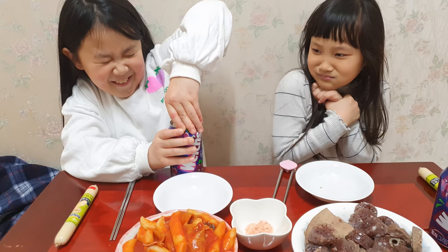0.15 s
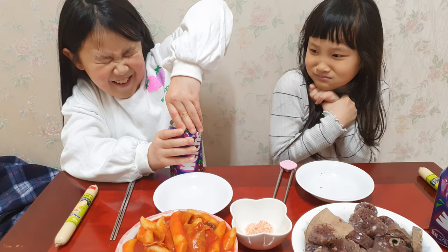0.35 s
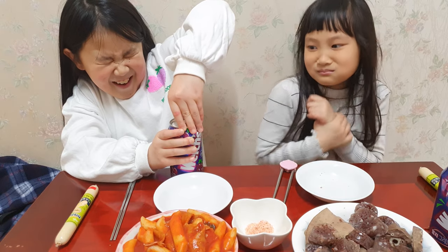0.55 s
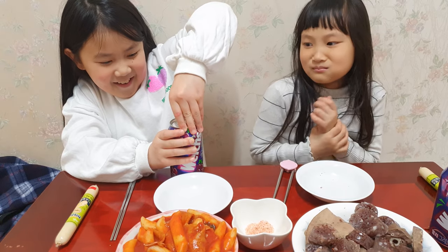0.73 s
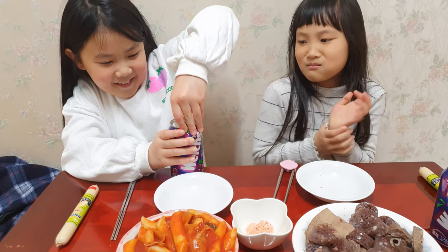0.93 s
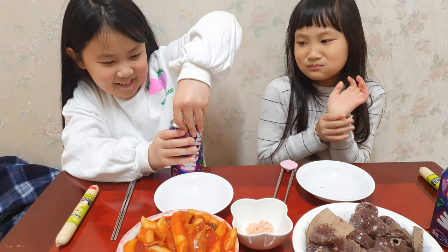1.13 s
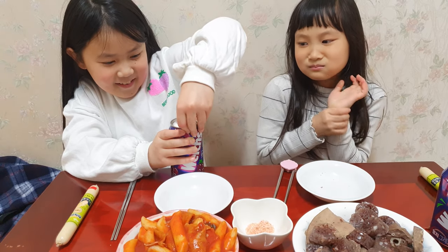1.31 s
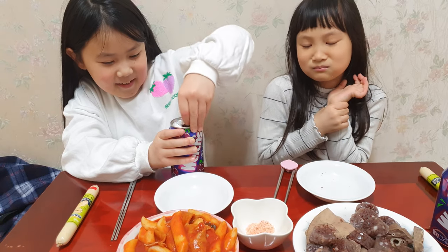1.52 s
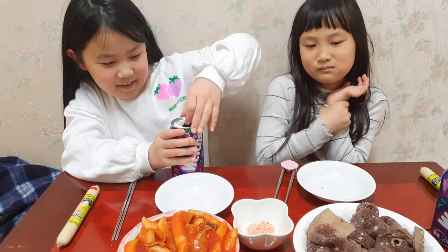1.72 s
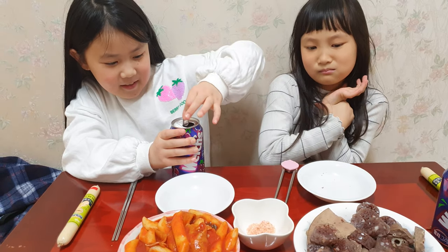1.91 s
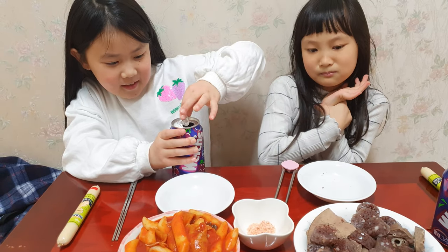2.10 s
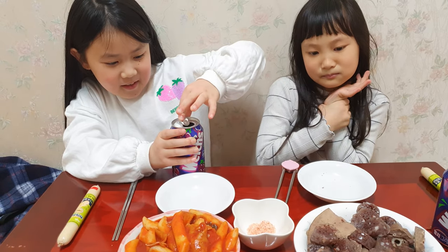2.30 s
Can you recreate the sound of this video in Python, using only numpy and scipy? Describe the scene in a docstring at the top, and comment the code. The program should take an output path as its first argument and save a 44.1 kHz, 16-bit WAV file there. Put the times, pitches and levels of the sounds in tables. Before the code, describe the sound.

A drink can cracks open with two sharp bursts, then light clicks and faint fizzing.

```python
"""A small room, a phone microphone close to a drink can on a low table. The ring-pull is forced open:
gas bursts twice through the tearing seal, shaking can and table and overloading the input, and the tab
snaps against the lid. Nails tick on the tab, fingers slide on the wall and rub the rim, and the can
knocks on the table. The drink fizzes faintly over a wavering low hum."""
import sys
import numpy as np
from scipy import signal
from scipy.io import wavfile
from scipy.ndimage import uniform_filter1d

SR = 44100
rng = np.random.default_rng(int(sys.argv[2]) if len(sys.argv) > 2 else 0)


def log_audio(samples):
    """Write samples as a 16-bit WAV file to the path given in sys.argv[1]."""
    # one column per channel
    frames = np.atleast_2d(samples).T
    # limit to full scale, then quantise
    limited = np.clip(frames, -1, 1)
    pcm = np.round(limited * 32767).astype(np.int16)
    wavfile.write(sys.argv[1], SR, pcm)


N = 103635


def amp(db):
    return 10 ** (np.asarray(db) / 20)


def unit_rms(x):
    return x / np.sqrt(np.mean(x ** 2) + 1e-20)


def at_hz(points, hz):
    f, values = np.transpose(points)
    return np.interp(np.log(hz + 1), np.log(f + 1), values)


def fader(rows, col=1):
    rows = np.array(rows)
    return amp(np.interp(np.arange(N) / SR, rows[:, 0], rows[:, col]))


def add(mix, start, sound):
    part = mix[round(start * SR):][:len(sound)]
    part += sound[:len(part)]


def slow_noise(span, size=N):
    return unit_rms(uniform_filter1d(rng.standard_normal(size), span))


def resonate(x, hz, width):
    """A two-pole resonance of gain 1."""
    return signal.lfilter(*signal.iirpeak(hz, hz / width, SR), x)


def hiss(colour, patchy_db, size=N):
    """Noise of a given colour with drifting patches."""
    hz = np.fft.rfftfreq(1024, 1 / SR)
    real, imag, patches = rng.standard_normal((size // 256 + 5, 513, 3)).T
    patches = unit_rms(uniform_filter1d(uniform_filter1d(patches, 16, 0), 12, 1))
    spectrum = (real + 1j * imag) * amp(at_hz(colour, hz)[:, None] + patchy_db * patches)
    return unit_rms(signal.istft(spectrum, nperseg=1024, noverlap=768)[1][:size])


def ring(modes, wobble=0.92):
    """The dying tones of a struck object, each wavering on its own."""
    t = np.arange(SR // 2) / SR
    wavers = [1 + wobble * slow_noise(500, len(t)) * np.minimum(t / 0.0043, 1) for _ in modes]
    tones = sum(waver * amp(db - 60 * t / t60) * np.sin(2 * np.pi * (hz * t + rng.random() / 4))
                for waver, (hz, db, t60) in zip(wavers, modes))
    return tones * np.minimum(t / 0.0012, 1)


# Hum in the room: t/s, then level/dB of each of the three tones
HUM_LEVELS = [(0.0, -31, -27, -63), (0.04, -29.5, -37.5, -32.5), (0.52, -33, -34, -35.5),
              (0.69, -37, -48, -65), (0.78, -35, -40, -46), (1.18, -45, -48.5, -43),
              (1.85, -30.5, -46.5, -46), (1.93, -28, -35.5, -37), (2.05, -39, -37.5, -37),
              (2.35, -28, -41, -30)]
def hum(tones_hz=(87.6, 120.5, 61.1), wanders=(.03, .02, .12), flutter_db=1.6):
    """Three low tones that waver in pitch and level."""
    out = np.zeros(N)
    for col, (hz, wander) in enumerate(zip(tones_hz, wanders), 1):
        drift, flutter = (unit_rms(uniform_filter1d(slow_noise(2000), 2000)) for _ in range(2))
        phase = 2 * np.pi * np.cumsum(hz * (1 + wander * drift)) / SR
        out += fader(HUM_LEVELS, col) * amp(flutter_db * flutter) * np.sqrt(2) * np.sin(phase)
    return out


# Background spectrum at the microphone: f/Hz, level/dB
ROOM_TONE = [(20, -19.5), (59, -7.5), (101, -2.5), (141, -5), (208, -19.5), (291, -21), (419, -38.5),
             (2230, -44), (9010, -44.5), (15700, -61)]
def room_tone(patchy_db):
    """A soft rumble with a trace of hiss."""
    return hiss(ROOM_TONE, patchy_db)


# The drink, close up: t/s, lower band level/dB, upper band level/dB
FIZZ_LEVELS = [(0.0, -58.5, -54), (0.3, -56, -78), (0.42, -60.5, -62), (0.58, -51, -48),
               (0.83, -62.5, -56.5), (0.87, -64, -53.5), (1.0, -61, -49.5), (1.06, -68, -63.5),
               (1.41, -67, -64), (1.61, -65, -77), (1.79, -57, -58.5), (2.07, -59, -70.5),
               (2.35, -57.5, -67)]
# Bubble spectrum: f/Hz, level/dB
FIZZ_SPECTRUM = [(1100, -49), (2000, -20), (3420, 2.5), (4270, -5.5), (5080, -1.5), (5680, -1.5), (8830, 2),
                 (11300, -9.5), (15700, -20)]
def fizz(split_hz=6540, pops_per_s=60):
    """Fine hiss of bubbles with sparse louder pops; its upper band swells on its own."""
    pops = rng.exponential(1, N) * (rng.random(N) < pops_per_s / SR)
    bubbles = hiss(FIZZ_SPECTRUM, 0.69) * (1 + 30 * uniform_filter1d(pops, 60))
    low, high = (signal.sosfiltfilt(signal.butter(4, split_hz, kind, fs=SR, output="sos"), bubbles)
                 for kind in ("low", "high"))
    return fader(FIZZ_LEVELS) * unit_rms(low) + fader(FIZZ_LEVELS, col=2) * unit_rms(high)


# Fingers on the can wall: t/s, length/s, level/dB
FINGER_SLIDES = [(0.039, 0.38, -58), (1.575, 0.18, -53.5), (1.853, 0.14, -45.5)]
# Spectrum of the rubbed wall: f/Hz, level/dB
WALL_SPECTRUM = [(350, -47), (600, -17), (976, 0.5), (1600, -17), (3420, -7.5), (9160, -9.5),
                 (11000, -20.5), (14300, -51.5)]
def finger_slides():
    """Skin brushes the can wall in short swishes."""
    out = np.zeros(N)
    for start, length, db in FINGER_SLIDES:
        t = np.arange(round(length * SR)) / SR
        fade = np.clip(np.minimum(t / 0.0079, (length - t) / 0.055), 0, 1)
        add(out, start, amp(db) * hiss(WALL_SPECTRUM, 1.5, len(t)) * fade)
    return out


def contact_noise(decay_s=0.0013, size=600):
    return rng.standard_normal(size) * np.exp(-np.arange(size) / SR / decay_s)


# Nails, close to the microphone: t/s, peak level/dB, bright spot f/Hz, relative tab ring level/dB
NAIL_TICKS = [(0.054, -33.5, 2900, -11.5), (0.187, -33.5, 5400, -18), (0.846, -25.5, 8600, -10),
              (1.2909, -29.5, 8330, -22), (1.581, -34.5, 2800, -4.5), (1.594, -40.5, 3960, -7),
              (1.8598, -17, 7200, -33), (1.8639, -17.5, 6090, -47), (1.873, -20.5, 5170, -54),
              (1.8774, -22, 3730, -33), (1.927, -29.5, 3570, -25), (1.939, -42, 3260, -8)]
# Modes of the tab: f/Hz, level/dB, t60/s
TAB_MODES = [(680, -8.5, 0.031), (950, -7, 0.33), (1153, -4, 0.19), (1223, -4, 0.2)]
def nail_ticks(low_hz=2170, top_hz=10200):
    """Short scratchy clicks, each with its own bright spot, set the tab ringing."""
    out = np.zeros(N)
    for start, db, hz, tab_db in NAIL_TICKS:
        band = signal.butter(4, [low_hz, min(top_hz, 2 * hz)], "band", fs=SR, output="sos")
        scratch = signal.sosfilt(band, contact_noise())
        click = 0.21 * scratch + resonate(resonate(scratch, hz, 0.6 * hz), hz, 1.2 * hz)
        add(out, start, amp(db) * click / abs(click).max())
        add(out, start, amp(db + tab_db) * ring(TAB_MODES) / 2)
    return out


# The seal, close up: t/s, gas level/dB, gas decay/s, can level/dB, thud level/dB, gas bass gain/dB
SEAL_CRACKS = [(0.2325, 8, 0.0066, -33.5, -12, -4.5), (.468, 8, 0.023, -9, -8, 6)]
# Spectrum of the escaping gas: f/Hz, level/dB
GAS_SPECTRUM = [(59, -27.5), (100, -10), (156, -8.5), (307, -16), (830, -11), (980, -5), (1350, -13),
                (3080, -5), (4240, -4.5), (6470, -8), (8520, -3.5), (13500, -25), (14500, -19.5),
                (15700, -22.5)]
# Modes of the can: f/Hz, level/dB, t60/s
CAN_MODES = [(444.6, 0.5, 0.27), (995, -7, 0.3), (1067, -5, 0.067), (2970, -9, .08)]
# Modes of the table under it: f/Hz, level/dB, t60/s
TABLE_MODES = [(147.3, -4, .16), (190, -3.5, 0.07), (440.3, -12, 0.08), (609, -2.5, 0.065),
               (722, -6.5, 0.052), (906, -5, 0.02), (1270, -4.5, 0.04), (3800, -15, 0.03)]
def seal_cracks(bass_hz=1320):
    """Gas bursts through the tearing seal; the rush shakes the can and the table thuds."""
    gas, body = np.zeros((2, N))
    t = np.arange(4096) / SR
    for start, db, decay_s, can_db, thud_db, bass_db in SEAL_CRACKS:
        colour = [(hz, level + bass_db / (1 + (hz / bass_hz) ** 4)) for hz, level in GAS_SPECTRUM]
        burst = np.minimum(t / 0.0015, 1) * np.exp(-t / decay_s)
        add(gas, start, amp(db) * hiss(colour, 0.98, len(t)) * burst)
        swell = (1 - np.exp(-np.arange(SR // 2) / SR / decay_s)) ** 2
        add(body, start, amp(can_db) * swell * ring(CAN_MODES))
        add(body, start, amp(thud_db) * ring(TABLE_MODES))
    return gas, body


# Modes of the lid: f/Hz, level/dB
LID_MODES = [(700, -5.5), (1715, -2.5), (2400, -2), (2845, -2), (3330, -6.5), (5040, 2), (8490, -6.5)]
def tab_snap(start=.4262, t60=.012):
    """The tab snaps against the lid, which rings very briefly."""
    out = np.zeros(N)
    add(out, start, amp(-11) * ring([(hz, db, t60) for hz, db in LID_MODES]))
    add(out, start, amp(-19.5) * contact_noise())
    return out


# The can on the low table: t/s, level/dB
CAN_KNOCKS = [(0.781, -17), (1.292, -34.5), (1.94, -31)]
def can_knocks():
    """A dull impact and a short rattle drive the modes of the table."""
    out = np.zeros(N)
    for start, db in CAN_KNOCKS:
        force = contact_noise(decay_s=0.011, size=4096)
        force[0] += 18  # the impact ahead of the rattle
        force /= np.linalg.norm(force)
        add(out, start, amp(db) * signal.fftconvolve(force, ring(TABLE_MODES)) / 2)
    return out


# A finger on the rim: t/s, level/dB
RUB_LEVELS = [(1.93, -45), (2.056, -44.5), (2.17, -67)]
# Resonances of the rim: f/Hz, width/Hz, level/dB
RIM_BANDS = [(553, 94, -3.5), (2930, 560, -3), (3630, 250, 4.5), (6680, 230, -6)]
def rim_rub():
    """Skin slips along the rim: grainy noise in a few resonances."""
    t = np.arange(N) / SR
    grit = rng.standard_normal(N) * amp(1.9 * slow_noise(300))
    rim = sum(amp(db) * unit_rms(resonate(resonate(grit, hz, width), hz, width))
              for hz, width, db in RIM_BANDS)
    fade = np.clip(np.minimum(t - RUB_LEVELS[0][0], RUB_LEVELS[-1][0] - t) / 0.069, 0, 1)
    return fade * fader(RUB_LEVELS) * unit_rms(rim)


# Reverberation of the small room: f/Hz, t60/s
ROOM_DECAY = [(120, 0.55), (330, 0.23), (870, 0.22), (2300, 0.2), (6060, 0.21)]
def room_echo(x):
    """Dense random echoes, each band dying at its own speed; a mid and a side tail."""
    hz, t, spectrum = signal.stft(rng.standard_normal((2, SR // 2)), SR, nperseg=256)
    decay = amp(-60 * t / at_hz(ROOM_DECAY, hz)[:, None])
    tails = signal.istft(spectrum * decay, SR, nperseg=256)[1]
    return signal.fftconvolve(x[None], tails / np.linalg.norm(tails[0]), axes=1)[:, :N]


def scene():
    """The can close and central, the room around it, in very narrow stereo."""
    gas, body = seal_cracks()
    handling = nail_ticks() + tab_snap() + can_knocks() + finger_slides() + rim_rub()
    echo_mid, echo_side = room_echo(amp(-2.5) * gas + amp(-14.5) * body + amp(-5.5) * handling)
    direct_gas = amp(-1.5) * gas
    mid = direct_gas + body + handling + echo_mid + fizz() + hum() + amp(-42) * room_tone(0.58)
    side = amp(-31) * (echo_side + amp(-3.5) * fizz() + direct_gas) + amp(-73.5) * room_tone(1.5)
    return np.array([mid + side, mid - side])


def record(dry, top_hz=15800):
    """This close, the phone's input clips hard on the cracks; a low-pass follows."""
    lowpass = signal.firwin(511, top_hz, window=("kaiser", 9), fs=SR)
    return signal.oaconvolve(np.clip(dry, -.98, .98), lowpass[None], "same")


dry = scene()
out = record(dry)
log_audio(out)
```